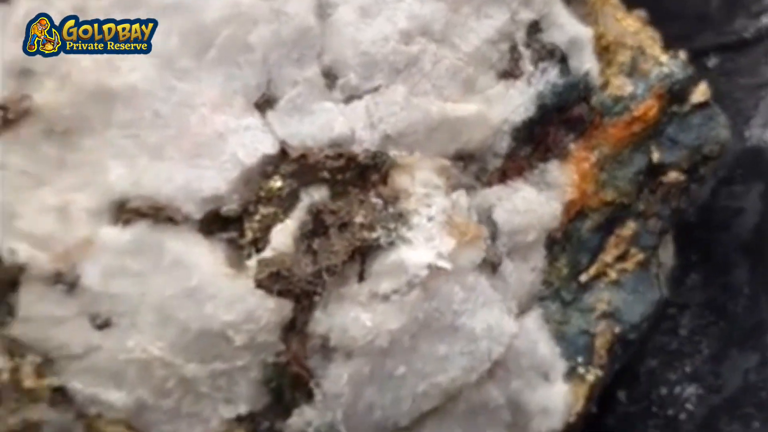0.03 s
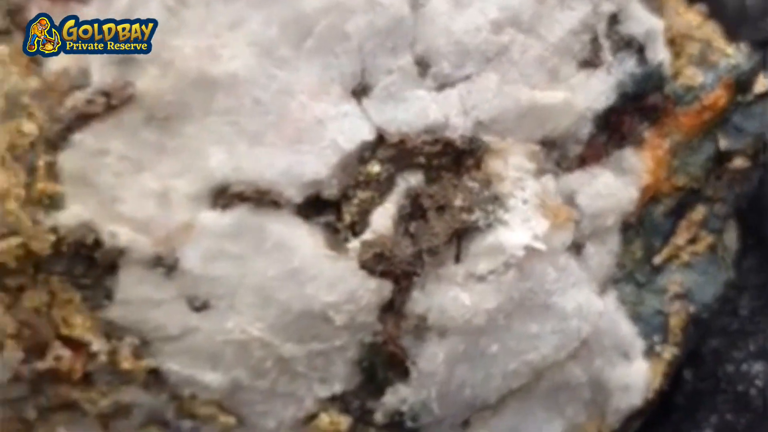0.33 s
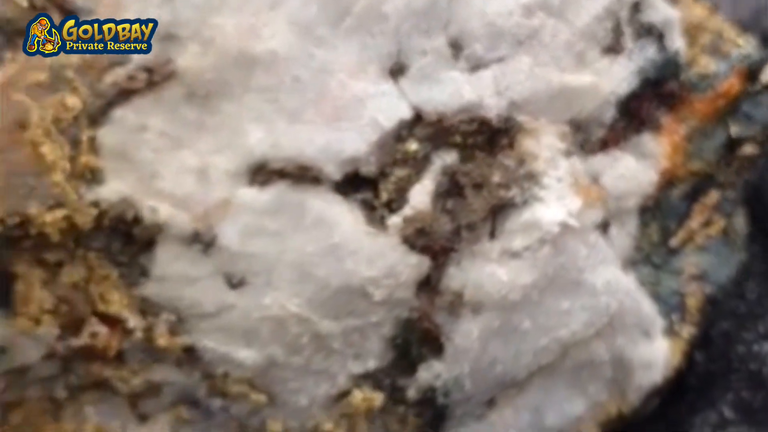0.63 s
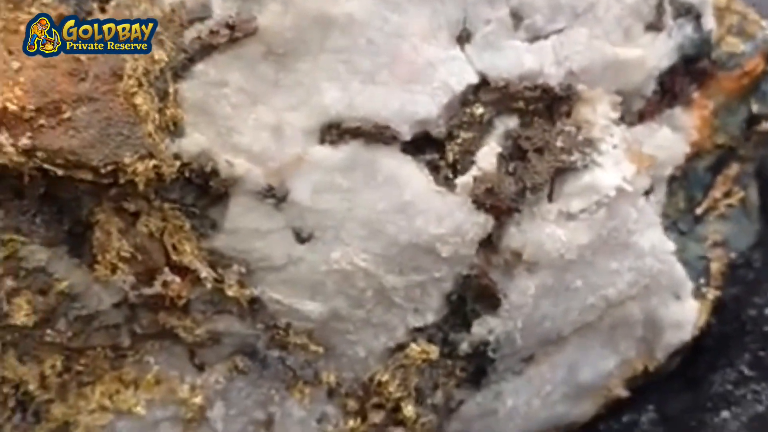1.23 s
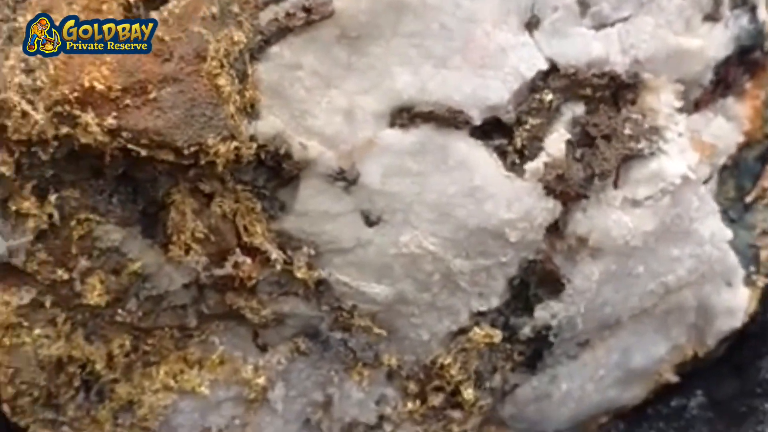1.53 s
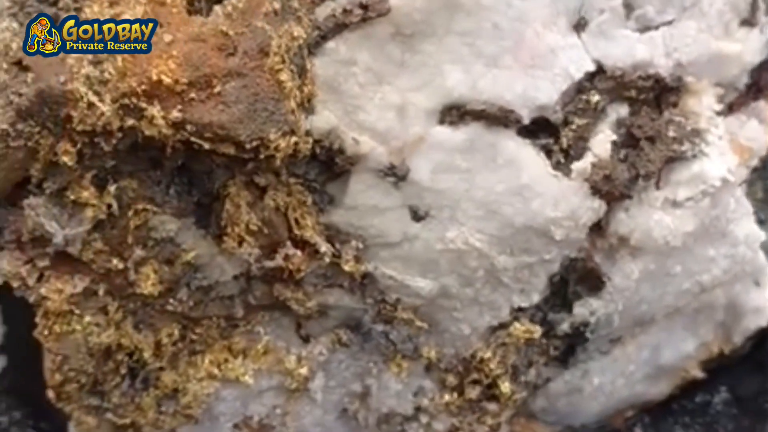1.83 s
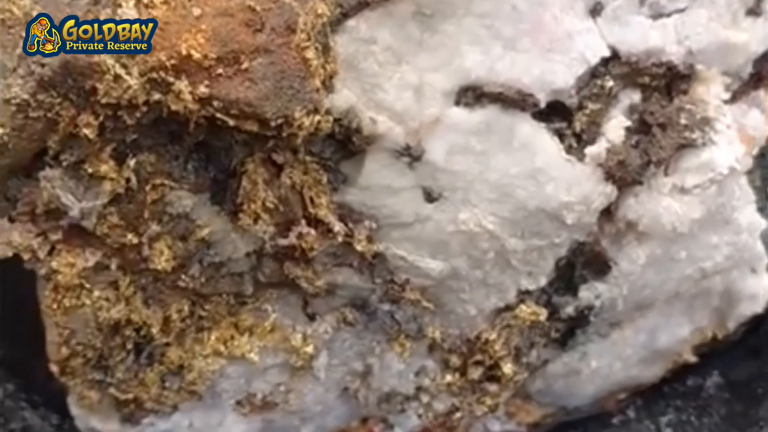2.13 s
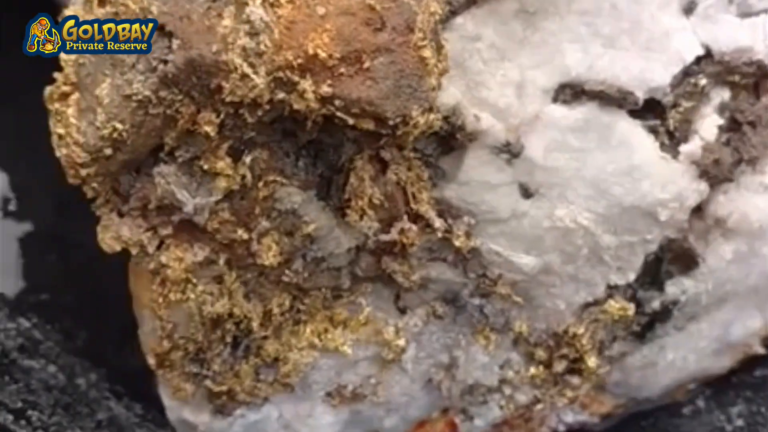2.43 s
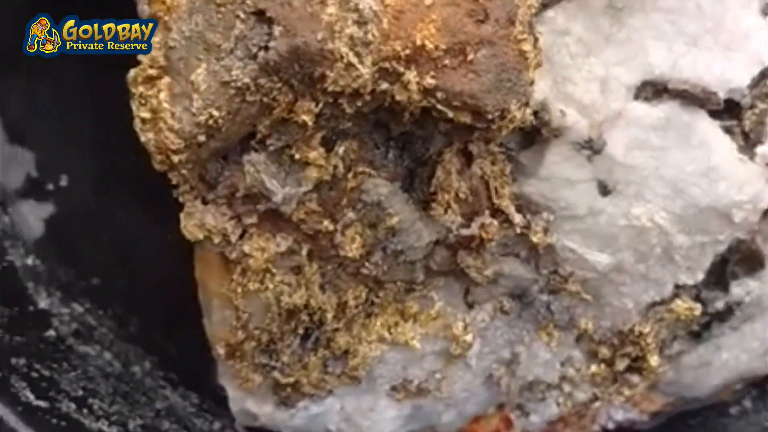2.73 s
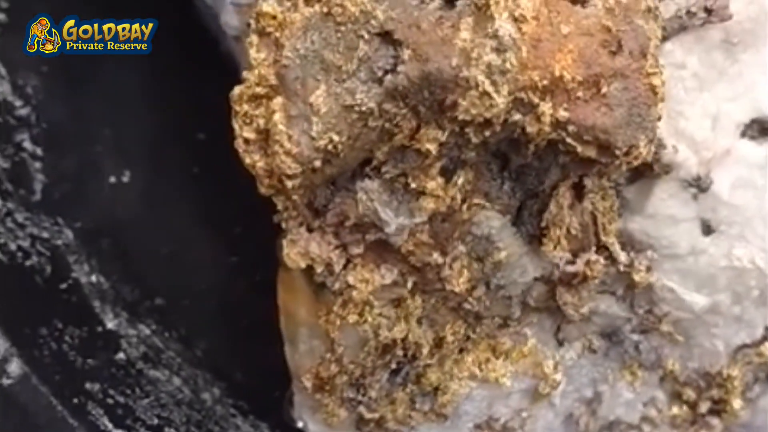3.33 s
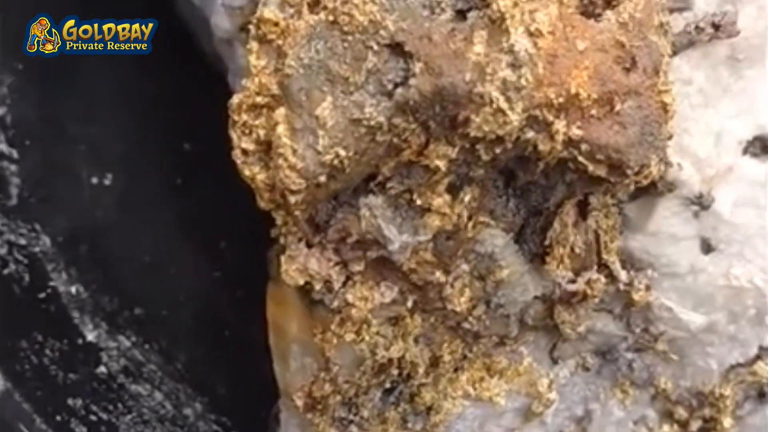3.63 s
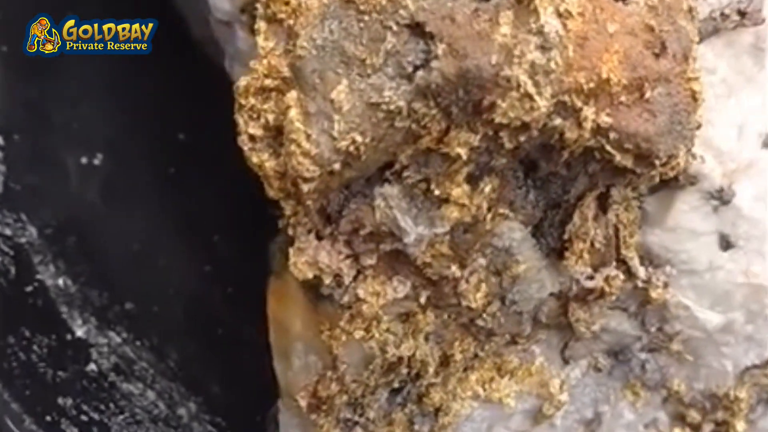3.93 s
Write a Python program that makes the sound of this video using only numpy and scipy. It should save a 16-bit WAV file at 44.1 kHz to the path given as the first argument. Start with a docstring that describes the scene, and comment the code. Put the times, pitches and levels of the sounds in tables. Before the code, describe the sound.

Acid fizzes softly on a rock in a plastic tub, heard close over low room noise. The fine hiss spurts around 0.6 seconds, with scattered bubble pops and sharp crackles, one clear pop at 0.4. A faint hollow rush swells from about 2.3 to 3 seconds. Then the crackles come thicker and louder, slightly to the right, knocking the tub into brief rings, the loudest at about 3.7 seconds.

```python
"""Inside a plastic tub, acid fizzes on a rock, close to a two-port microphone.
Countless tiny bubbles burst into a hiss that comes in spurts, and a few larger ones pop with a pitch.
Sharp crackles snap off the rock and knock the tub into a short ring.
Underneath lies a low bed of room noise, with a hollow rush that swells and fades past the middle."""
import sys
import numpy as np
from scipy import signal
from scipy.fft import rfft, irfft
from scipy.io import wavfile

SR = 44100
rng = np.random.default_rng(int(sys.argv[2]) if len(sys.argv) > 2 else 0)


def to_wav(sig):
    """Store sig (one row per channel, or 1-D mono) as 16-bit WAV at the path in sys.argv[1].

    Samples outside -1..1 are clipped; the rate is SR.
    """
    pcm = np.clip(np.atleast_2d(sig), -1, 1) * 32767
    pcm = np.round(pcm).astype(np.int16)
    wavfile.write(sys.argv[1], SR, pcm.T)  # frames by channels


N = 176400

# Fader rides. Each row: time in seconds, room level in dB, fizz level in dB.
FADERS = [(0, -46.7, -43.5), (.13, -48, -48), (.34, -49.5, -53), (.5, -49.5, -55), (.65, -48.5, -49.5),
          (.8, -48.5, -52), (1.1, -49.5, -53), (1.57, -51, -52.5), (1.93, -51, -55.5), (2.2, -53.2, -55),
          (2.57, -52, -52), (2.95, -49.5, -53.5), (3.12, -52.5, -52.5), (3.3, -51.5, -51),
          (3.6, -52.5, -52.5), (3.75, -52.5, -52.5), (3.87, -57.5, -59.5), (4, -52.5, -59)]
# Spurts of gas. Each row: peak time in seconds, half-length in seconds, level in dB.
GAS_SPURTS = [(0.597, 0.027, -47), (0.716, 0.0099, -46), (2.233, 0.014, -55), (3.352, 0.017, -45),
              (3.9, 0.012, -43.5)]
# Larger bubbles. Each row: start in seconds, pitch in Hz, level in dB, time to fall 60 dB in seconds.
BUBBLE_POPS = [(.02, 4050, -19, 0.0035), (.0245, 3650, -24, 0.0032), (.266, 3350, -28, 0.0043),
               (.2858, 5900, -22, 0.0038), (0.3944, 3200, 1.5, 0.0019), (0.3944, 5950, -16.5, 0.0035),
               (0.581, 1820, -11.5, 0.0039), (0.9268, 950, -24, 0.0089), (1.03, 1260, -37, 0.017),
               (1.042, 1150, -39, .015), (1.3275, 3770, -16, 0.0028), (1.3277, 5870, -23, 0.0038),
               (1.7193, 3500, -27.5, 0.0037), (3.346, 950, -33, 0.018), (3.4485, 1520, -19, .014),
               (3.8096, 3030, -30, 0.0076)]
# Crackle cues. Each row: time in seconds, relative snap level in dB, relative knock level in dB,
# brightness in dB per octave.
CRACKLES = [(0.144, -28.5, -40, -12), (0.174, -20.5, -34, -2.5), (0.194, -26, -44, -8),
            (0.2852, -26.5, -30, -9), (0.303, -35, -46, -7), (0.3796, -23.5, -33, -1),
            (.3945, -13.5, -30, -2.5), (.539, -21.5, -26, 3), (.588, -20, -42, -4), (0.611, -19.5, -47, -7),
            (0.621, -19.5, -40, -5), (0.6887, -22, -54, 0), (0.9304, -37, -38, 0), (1.084, -32, -51, -3),
            (1.133, -26.5, -48, 1), (1.3281, -16, -35, -1.5), (1.4373, -19, -22, 0),
            (1.7193, -20, -27.5, 4), (1.76, -27, -40, 4), (1.781, -29, -35, 1), (1.962, -31, -44, 3),
            (2.2113, -30.5, -37, 2), (2.3973, -17.5, -22.5, 5.5), (2.5883, -17, -22, 3.5),
            (2.6517, -21, -35, 4), (3.0165, -18, -17, 3.5), (3.1395, -11, -14.5, 0.5),
            (3.1407, -15, -19, -2), (3.1712, -15, -16.5, 1), (3.207, -25, -25, 0), (3.2176, -12.5, -14, 3),
            (3.3167, -8.5, -13, -1.5), (3.3947, -20.5, -30, 1), (3.4457, -11.5, -12.5, 6.5),
            (3.447, -9, -8.5, 0), (3.6737, -18, -31, -1), (3.7146, -15, -23.5, 0), (3.7306, -21, -27, -1),
            (3.746, -1.1, -5.3, 0), (3.7482, -12, -26, 1), (3.791, -38, -42, -5)]
# The tub's modes. Each row: pitch in Hz, relative level in dB, time to fall 60 dB in seconds.
TUB_MODES = [(170, -4.5, 0.18), (353, 1, 0.058), (393.3, 2.5, 0.16), (576, -0.5, 0.078), (826, -5, 0.069),
             (1122, -1.5, 0.055), (1202, -1.5, 0.038), (1536, 2, 0.026), (2670, 1, 0.021), (3375, 5, 0.018),
             (4090, 1.5, 0.018), (5800, 3, 0.017)]
# Decay inside the tub. Each row: frequency in Hz, time to fall 60 dB in seconds.
TUB_DECAY = [(100, 0.14), (400, 0.071), (1200, 0.053), (3000, 0.055), (12000, 0.017)]
# Swell of the hollow rush. Each row: time in seconds, level in dB.
RUSH_FADER = [(2.2, -73), (2.38, -52), (2.6, -51), (2.98, -49), (3.12, -67)]

# EQ curves of the layers. Each row: frequency in Hz, relative level in dB.
FIZZ_EQ = [(100, -32), (900, -10.5), (2300, -7), (2900, -1), (3450, -0.5), (4000, -2.5), (4800, -1.5),
           (6500, 1), (7700, -2.5), (9200, -4), (11200, -10), (12500, -9.5), (14500, -16.5), (16000, -47)]
SNAP_EQ = [(100, -39), (1000, -15), (1650, -8.5), (2250, -14), (2700, -5.5), (3000, -10), (3350, -3),
           (3750, -6), (4200, -1), (5850, 6), (6400, -3), (6900, 4.5), (7700, -4), (8800, 2), (10200, -3),
           (11200, -5.5), (12900, -16), (13600, -12), (15000, -21), (16000, -30)]
KNOCK_EQ = [(40, -31), (100, 0.5), (165, -0.5), (250, -6), (400, -1), (700, -0.5), (950, -8.5), (1200, 0.5),
            (1330, -3.5), (1650, -2.5), (2200, -9), (3400, -7), (6000, -12), (15000, -41)]
ROOM_EQ = [(25, -31), (42, -21), (65, -7), (130, -5.5), (230, 1), (330, -0.5), (400, 0), (600, -3.5),
           (1100, -9), (1350, -13), (1650, -15.5), (1900, -13), (2400, -22.5), (6000, -53), (16000, -70)]
RUSH_EQ = [(100, -26), (220, -8.5), (320, -1), (440, 1), (580, -14), (1000, -14.5), (2300, -27),
           (3150, -18), (3520, -9.5), (3900, -20), (12000, -43)]

# Two stereo images: one for the bed of fizz, bubbles and background, one for the crackles.
# How far the left port trails the right. Each row: frequency in Hz, phase lag in radians.
BED_LAG = [(20, 0), (70, -1.7), (220, -.6), (650, -.6), (780, 0), (1350, .1), (2050, 3.14), (2550, 3.14),
           (2950, 6.2), (3600, 6.2), (4500, 9), (5500, 11.1), (7200, 15.3), (9300, 20.8), (13000, 9.4),
           (16000, 0)]
CRACKLE_LAG = [(100, -3), (500, 0.83), (1200, 0), (2200, 3), (3000, 4.5), (3700, 6.5), (4700, 9.5),
               (6000, 10.5), (7400, 17), (9400, 22.5), (11000, 28), (16000, 38.5)]
# Left port's level against the right. Each row: frequency in Hz, gain in dB.
BED_SHADE = [(60, 2), (250, 1.5), (1200, 0), (2100, 0), (2500, 0), (3500, -2), (5000, -2.5), (6500, -5.5),
             (8500, -4), (10000, 0), (15000, -1)]
CRACKLE_SHADE = [(60, -0.5), (400, -1.5), (2200, 1), (3400, -2), (4100, -1.5), (5000, -5), (7000, -5),
                 (8500, -10), (10000, -12), (11500, -4.5), (15000, 0)]
# How alike the two ports sound. Each row: frequency in Hz, likeness from 0 to 1.
BED_LIKENESS = [(60, .65), (160, .55), (400, .75), (650, .6), (900, .95), (1200, 1), (1550, .2), (2080, 1),
                (2500, 1), (2750, .05), (3400, .85), (3950, .28), (4500, .55), (7000, .55), (8700, .2),
                (15000, .5)]
CRACKLE_LIKENESS = [(100, 0.76), (800, 0.74), (1200, 0.96), (1900, 0.81), (5000, 0.73), (8000, 0.7),
                    (9000, 0.92), (15000, 0.57)]


def fizz(bursts_per_s=2000, spread_db=3.3, decay_s=0.001, hiss_share=0.58):
    """Tiny bubbles burst as brief ticks of very unequal size; the smallest merge into hiss."""
    t = np.arange(N) / SR
    sizes = amp(spread_db * np.minimum(rng.exponential(1, N), 6))
    bursts = sizes * (rng.random(N) < bursts_per_s / SR)
    tick_power = signal.lfilter([1], [1, -np.exp(-2 / (decay_s * SR))], bursts ** 2)
    grain = np.sqrt(hiss_share + (1 - hiss_share) * tick_power / tick_power.mean())
    ticks = grain * rng.standard_normal((2, N))
    spurt_power = sum(amp(db) ** 2 * np.exp(-((t - s) / half) ** 2) for s, half, db in GAS_SPURTS)
    gas = np.sqrt(fader(FADERS, column=2) ** 2 + spurt_power)
    return colour(ticks * gas, FIZZ_EQ)


def bubble(hz, t60, rise_cycles=0.36):
    """A bursting bubble swells within about a cycle, then rings away on one pitch."""
    t = np.arange(0, t60 * 2, 1 / SR)
    attack = (1 - np.exp(-t * hz / rise_cycles)) ** 2
    return np.sin(2 * np.pi * hz * t) * amp(-60 * t / t60) * attack


def bubbles(blips_per_s=45, low_hz=800, high_hz=4000, decay_cycles=4.8):
    """Larger bubbles pop on cue, among faint random blips that ride the fizz fader."""
    out = np.zeros((2, N))
    for s, hz, db, t60 in BUBBLE_POPS:
        add(out[0], s, amp(db) * bubble(hz, t60))
    gas = fader(FADERS, column=2)
    for when, pitch, faintness in rng.random((int(blips_per_s * N / SR), 3)):
        hz = low_hz * (high_hz / low_hz) ** pitch
        gain = gas[int(when * N)] * amp(1 - 3 * np.log(faintness + 0.036))  # a few stand out
        t60 = np.log(1000) * decay_cycles / hz
        add(out[0], when * N / SR, gain * bubble(hz, t60))
    return out


def snaps(rise_s=0.0001, rock_decay_s=0.00063, tub_decay_s=0.0061, pivot_hz=6500, size=2048):
    """Each crackle is one sharp spike, bright or dull, followed by its scatter off the rock and tub."""
    out, t = np.zeros((2, N)), np.arange(size) / SR
    reflections = np.exp(-t / rock_decay_s) + amp(-19.5) * np.exp(-t / tub_decay_s)
    scatter = reflections * (1 - np.exp(-t / rise_s))
    scatter *= amp(2.6) / np.linalg.norm(scatter)
    octaves = np.clip(np.log2(np.fft.rfftfreq(size, 1 / SR) / pivot_hz + 1e-9), -1, 1)
    for s, snap_db, _, brightness in CRACKLES:
        burst = rng.standard_normal((2, size)) * scatter
        burst[0, 0] = amp(4.8)  # the spike
        tilt = np.fft.fftshift(irfft(amp(brightness * octaves)))
        snap = signal.fftconvolve(burst, tilt[None], axes=1)
        add(out, s - size / 2 / SR, amp(snap_db) * snap)  # early by the tilt filter's delay
    return colour(out, SNAP_EQ)


def knocks(delay_s=0.0008, rise_s=0.0008, rattle_trim_db=-2.2, ring_trim_db=-23.7, size=16384):
    """Just after each snap the tub answers: a thud, ringing modes and a dull rattle dying inside it."""
    rattle, ring, t = np.zeros((2, N)), np.zeros((2, N)), np.arange(size) / SR
    modes = np.array([amp(db - 60 * t / t60) * np.cos(2 * np.pi * hz * t) for hz, db, t60 in TUB_MODES])
    modes *= 1 - np.exp(-t / rise_s)
    for s, _, knock_db, _ in CRACKLES:
        hz, age, noise = signal.stft(rng.standard_normal((2, size)), SR, nperseg=128)
        decay = amp(-60 * age / curve(TUB_DECAY, hz)[:, None])
        _, tail = signal.istft(noise * decay, SR, nperseg=128)
        tail /= np.linalg.norm(tail[0])
        tail[0, 0] = amp(-12)  # the thud: the first push on the tub
        add(rattle, s + delay_s, amp(knock_db + rattle_trim_db) * tail)
        place_db = 0.8 * rng.standard_normal(len(TUB_MODES))  # each place rings the modes its own way
        add(ring[0], s + delay_s, amp(knock_db + ring_trim_db + place_db) @ modes)
    return colour(rattle, KNOCK_EQ) + ring


def background():
    """Low room noise, and a hollow rush that swells and fades."""
    room = unit_rms(colour(rng.standard_normal((2, N)), ROOM_EQ))
    rush = unit_rms(colour(rng.standard_normal((2, N)), RUSH_EQ))
    return fader(FADERS, column=1) * room + fader(RUSH_FADER, column=1) * rush


def ports(pair, lag, shade, likeness):
    """The right port hears the first signal; the left gets it lagged, shaded, blended with the second."""
    hz = np.fft.rfftfreq(N, 1 / SR)
    near, other = rfft(pair)
    same = curve(likeness, hz)
    blend = same * near + np.sqrt(1 - same ** 2) * other
    left = blend * amp(curve(shade, hz)) * np.exp(-1j * curve(lag, hz))
    return np.array([irfft(left, N), pair[0]])


def amp(db):
    """Decibels to gain."""
    return 10 ** (np.asarray(db) / 20)


def unit_rms(x):
    """Scales to rms 1."""
    return x / np.sqrt(np.mean(x ** 2) + 1e-20)


def curve(points, hz):
    """Reads a table on a log-frequency axis."""
    f, value = np.transpose(points)
    return np.interp(np.log(hz + 1), np.log(f + 1), value)


def fader(points, column):
    """One column of a fader ride as a gain per sample."""
    rows = np.array(points)
    return amp(np.interp(np.arange(N) / SR, rows[:, 0], rows[:, column]))


def add(mix, s, sound):
    """Mixes a sound in at s seconds."""
    part = mix[..., round(s * SR):][..., :sound.shape[-1]]
    part += sound[..., :part.shape[-1]]


def colour(x, eq, size=4096):
    """Applies an EQ curve as a causal filter of unit energy."""
    log_gain = np.log(amp(curve(eq, abs(np.fft.fftfreq(size, 1 / SR)))))
    minimum_phase = np.exp(np.conj(signal.hilbert(log_gain)))
    taps = np.fft.ifft(minimum_phase).real[:size // 2]
    return signal.oaconvolve(x, taps[None] / np.linalg.norm(taps), axes=1)[:, :x.shape[1]]


def scene():
    """The fizz comes from all over the tub; the crackles come from one spot on the right."""
    bed = ports(background() + fizz() + bubbles(), BED_LAG, BED_SHADE, BED_LIKENESS)
    crackles = ports(snaps() + knocks(), CRACKLE_LAG, CRACKLE_SHADE, CRACKLE_LIKENESS)
    return bed + crackles


def record(dry):
    """A steep high cut at 16.2 kHz takes off the very top."""
    high_cut = signal.firwin(255, 16200, window=("kaiser", 9), fs=SR)
    return signal.oaconvolve(dry, high_cut[None], "same")


dry = scene()
out = record(dry)
to_wav(out)
```